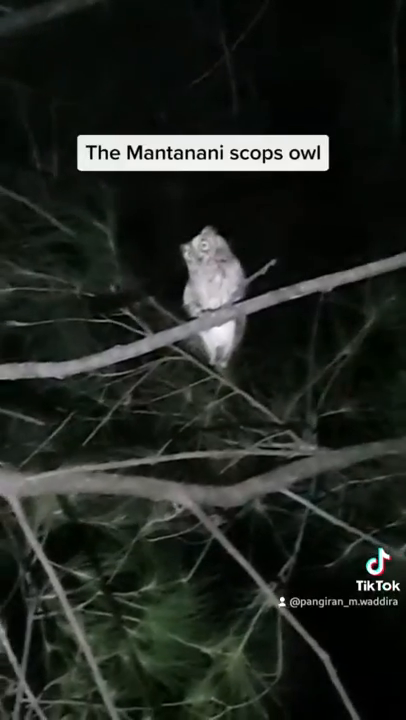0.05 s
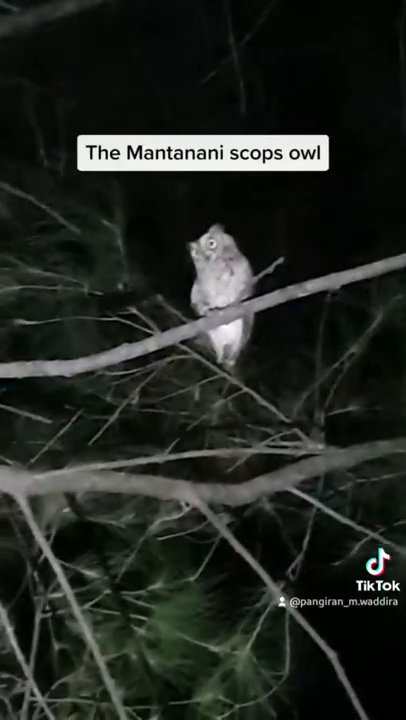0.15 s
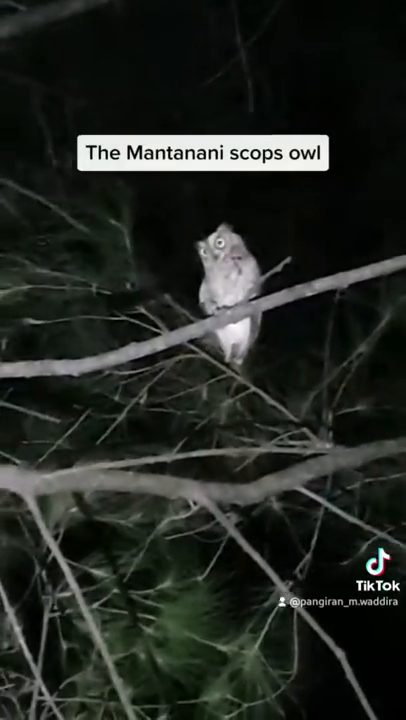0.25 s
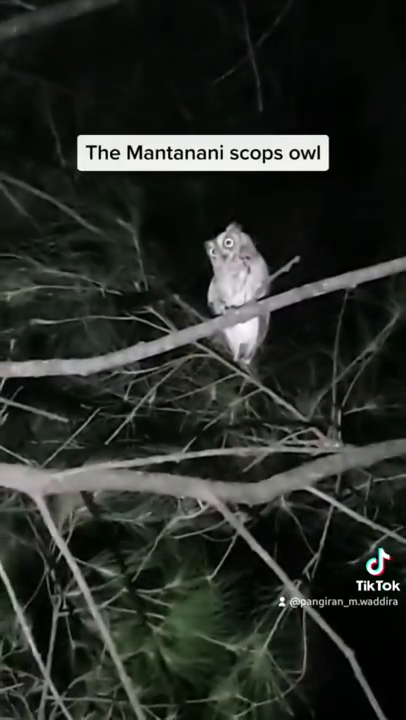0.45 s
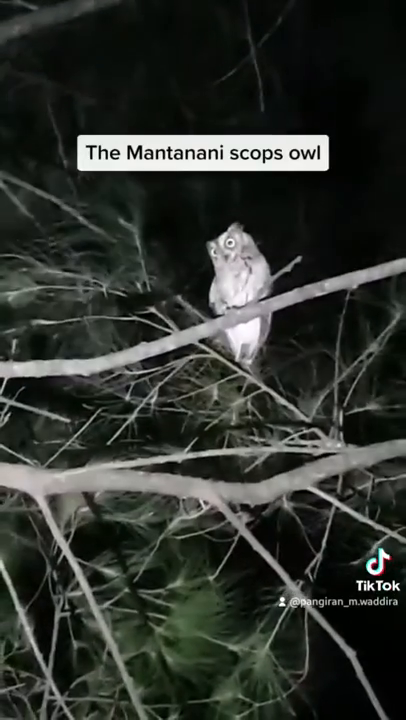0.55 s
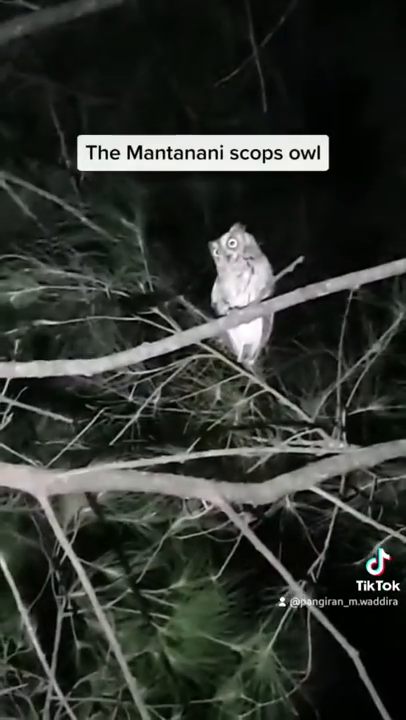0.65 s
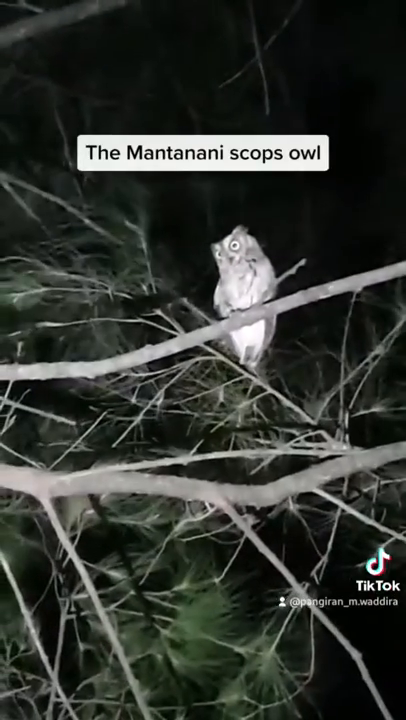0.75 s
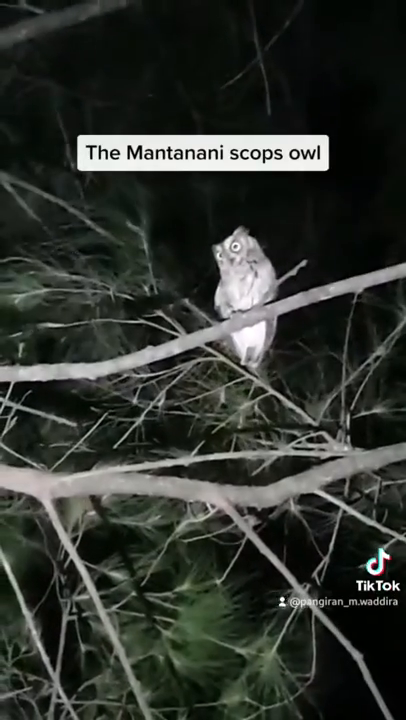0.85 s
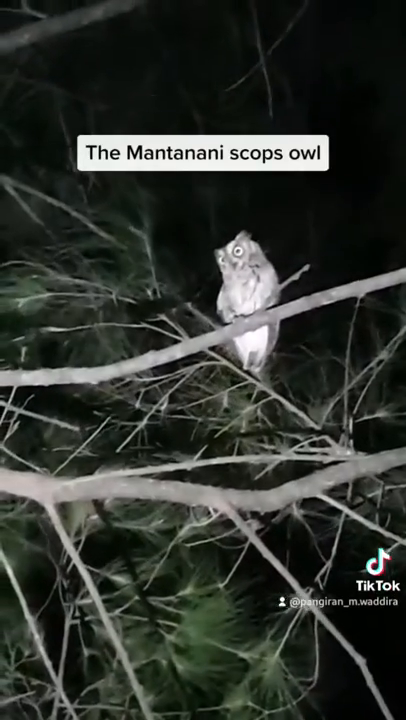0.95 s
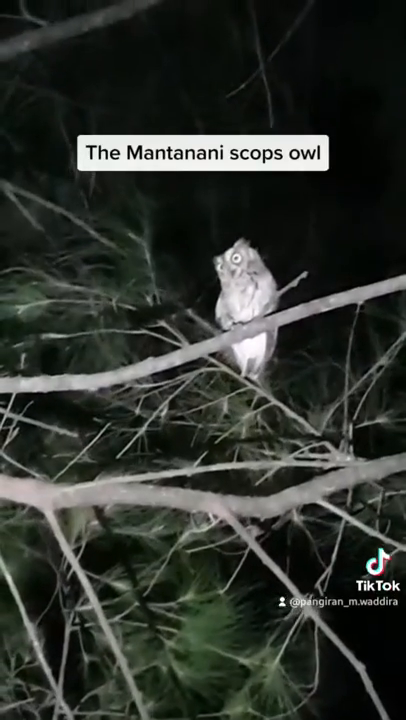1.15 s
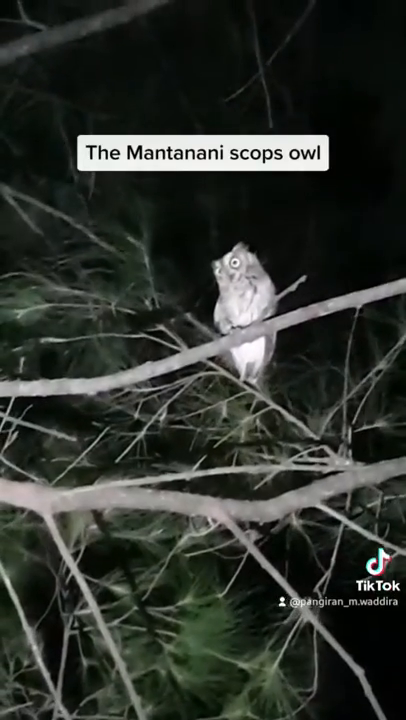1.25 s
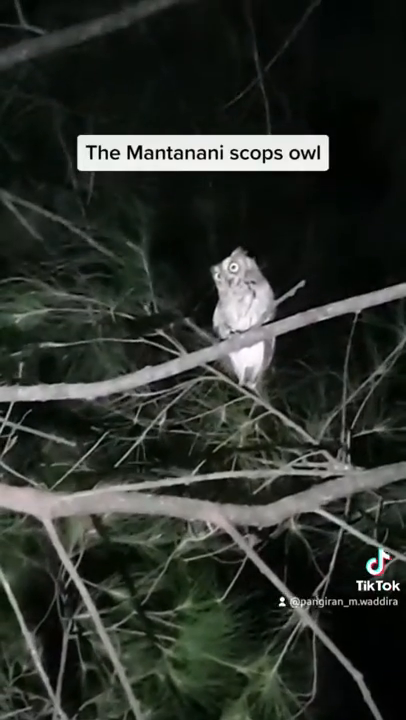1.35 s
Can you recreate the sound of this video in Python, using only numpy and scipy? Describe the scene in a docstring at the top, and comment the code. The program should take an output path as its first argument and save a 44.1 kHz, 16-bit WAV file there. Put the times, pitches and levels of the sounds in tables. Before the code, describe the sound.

An owl gives one long, pure, falling hoot straight ahead, and a second owl overlaps it almost at once. Crickets chirp and tick faintly in the night wood, while a hand clicks and rustles softly on the microphone.

```python
"""Scops owls in a night wood

Straight ahead of a hand-held stereo microphone, a scops owl gives one long, pure, falling hoot.
A second voice, probably its mate, joins a moment later and the two beat. Among the trees a cricket
chirps with its wings and a bush-cricket ticks very high; far insects and a low hum fill the dark.
Close by, the hand on the microphone creaks, clicks and rustles faintly."""
import sys
import numpy as np
from scipy import signal
from scipy.fft import rfft, irfft, next_fast_len
from scipy.io import wavfile
from scipy.ndimage import map_coordinates

SR = 44100
rng = np.random.default_rng(int(sys.argv[2]) if len(sys.argv) > 2 else 0)


def log_audio(samples):
    """Write samples as a 16-bit WAV file to the path given in sys.argv[1]."""
    # one column per channel
    frames = np.atleast_2d(samples).T
    # limit to full scale, then quantise
    limited = np.clip(frames, -1, 1)
    pcm = np.round(limited * 32767).astype(np.int16)
    wavfile.write(sys.argv[1], SR, pcm)


N = 61739

# likeness of left and right in every noise: f/Hz, correlation/0-1
STEREO_LIKENESS = [(30, 0.28), (200, 0.69), (1000, 0.63), (3000, 0.37), (8000, 0.24), (13000, 0.41)]
# night air: f/Hz, relative level/dB
AIR_SPECTRUM = [(25, -10), (55, 0), (120, -4), (250, -9), (500, -11), (1000, -12), (1800, -12.3),
                (3000, -16.5), (5500, -19.5), (9000, -21.5), (14500, -23.5), (15500, -31)]
# far insects: f/Hz, relative level/dB
CHORUS_SPECTRUM = [(3000, -17), (3450, -8), (3750, 2), (4050, -6.5), (4350, -9.5), (4700, -25), (5000, -25),
                   (5500, -24.5)]
# swells of the low hum: t/s, level/dB
HUM_LEVEL = [(0, -60), (.45, -49), (.62, -33.5), (.75, -46), (.92, -36), (1.05, -47), (1.17, -38),
             (1.4, -47)]
# dull rustle of the grip: f/Hz, relative level/dB
RUSTLE_SPECTRUM = [(20, -18), (50, 0.5), (80, -8), (150, -17), (400, -13), (1500, -21.5), (5000, -24),
                   (12000, -38)]
# swells of that rustle: t/s, level/dB
RUSTLE_LEVEL = [(0, -54.5), (.3, -37), (.41, -70), (.49, -51), (.72, -41), (.86, -41), (.93, -49),
                (1.19, -58), (1.25, -57), (1.36, -35.5)]
# creaks of the grip: start/s, length/s, slip spacing/s, level/dB
CREAK_RUNS = [(0.441, 0.054, .0182, -24.5), (0.587, .045, 0.016, -25.5), (0.753, .095, .0138, -28.5)]
# resonances of one slip: f/Hz, relative level/dB, t60/s
THUD_MODES = [(90, -7, 0.019), (210, -1.5, 0.019), (392, 3, 0.0099)]
# handling clicks: t/s, ring level/dB, resonance/Hz, t60/s, crack level/dB
HANDLING_CLICKS = [(0.336, -19, 1905, 0.016, -23), (0.4262, -12.5, 1684, 0.017, -24.5),
                   (0.4604, -21, 1614, 0.0096, -43), (0.56, -21.5, 1617, 0.029, -46),
                   (0.574, -44, 1200, 0.029, -25), (0.637, -37, 1320, 0.024, -21),
                   (0.768, -38, 4500, 0.015, -24), (.876, -24, 2247, 0.044, -30.5),
                   (0.896, -25, 1263, 0.043, -26), (.923, -23, 4320, 0.011, -25),
                   (1.176, -33, 4440, 0.011, -16), (1.288, -30, 2184, 0.021, -34),
                   (1.36, -22.5, 1077, 0.016, -22), (1.3675, -23, 1700, 0.034, -35),
                   (1.391, -25.5, 1100, .03, -19)]
# bright crack of a click: f/Hz, relative level/dB
CRACK_SPECTRUM = [(300, -9), (1500, 1), (4500, 3.5), (9000, -2), (15000, -7.5)]
# runs of bush-cricket ticks: start/s, end/s, tick spacing/s
BUSH_CRICKET_RUNS = [(.0055, .52, .02642), (.598, .61, .0266), (.6635, 1.21, .02673), (1.290, 1.4, .0267)]
# rasp of a tick: f/Hz, relative level/dB
TICK_SPECTRUM = [(8000, -2.5), (10000, -10), (10900, 2.5), (12200, -1.5), (13800, 6.5), (14500, -12),
                 (15500, -22)]
# cricket chirps: start/s, length/s, level/dB
CRICKET_CHIRPS = [(0.027, .11, -35.5), (0.277, .01, -34), (0.2867, .1, -22.5), (0.401, .075, -38),
                  (.672, .1, -21), (0.78, .02, -31), (0.9977, .115, -24), (1.118, .03, -37.5),
                  (1.376, .1, -23.5)]
# hoot of the first owl: t/s, f/Hz, level/dB
FIRST_OWL = [(0.185, 735.2, -33.3), (0.21, 755.6, -18.7), (0.255, 818.5, -9.8), (0.33, 812.7, -10.4),
             (0.4, 822.7, -10.4), (0.44, 808.4, -4.9), (0.49, 809.3, -6.1), (0.56, 782.0, -15.8),
             (0.61, 766.4, -16.3), (0.66, 739.9, -16.3), (0.76, 701.7, -23.2), (0.81, 680.5, -23.7),
             (0.86, 657.6, -28.6), (0.96, 589.0, -43.0)]
# hoot of the owl that joins: t/s, f/Hz, level/dB
SECOND_OWL = [(0.28, 710.5, -33.3), (0.31, 769.4, -9.2), (0.35, 807.6, -18.4), (0.39, 801.9, -26.0),
              (0.42, 790.7, -21.0), (0.452, 810.4, -7.2), (0.475, 828.9, -12.4), (0.49, 806.6, -11.1),
              (0.545, 808.2, -7.7), (0.6, 803.4, -7.9), (0.68, 776.8, -11.5), (0.77, 734.7, -13.2),
              (0.81, 721.5, -14.8), (0.85, 703.6, -20.1), (0.92, 677.7, -20.3), (1.04, 605.1, -39.4)]


def amp(db):
    """Decibels to gain."""
    return 10 ** (np.asarray(db) / 20)


def unit(x):
    """Scale to rms 1."""
    return x / np.sqrt(np.mean(x ** 2) + 1e-20)


def clock():
    """Time of every sample."""
    return np.arange(N) / SR


def along(points, hz):
    """Read (f/Hz, value) points on a log frequency axis."""
    freqs, values = np.transpose(points)
    return np.interp(np.log(hz + 1), np.log(freqs + 1), values)


def envelope(points):
    """Gain per sample from (t/s, level/dB) points."""
    return amp(np.interp(clock(), *np.transpose(points)))


def wobble(rate):
    """A smooth random curve, rate knots a second."""
    return map_coordinates(rng.standard_normal(int(N * rate / SR) + 4), [clock() * rate])


def fade(t, t60):
    """Exponential decay, 60 dB down after t60 seconds."""
    return np.exp(-np.log(1000) * t / t60)


def filtered(x, response):
    """Shape x with a gain given as a function of frequency."""
    size = next_fast_len(N + SR // 2)
    return irfft(rfft(x, size) * response(np.fft.rfftfreq(size, 1 / SR)), size)[..., :N]


def stereo_noise(spectrum):
    """Coloured noise of rms 1, partly alike in left and right."""
    def mid_side_gains(hz):
        angle = np.arccos(np.clip(along(STEREO_LIKENESS, hz), -1, 1)) / 2
        return amp(along(spectrum, hz)) * [np.cos(angle), np.sin(angle)]
    mid, side = filtered(rng.standard_normal((2, N)), mid_side_gains)
    return unit(np.array([mid + side, mid - side]))


def wood_reverb(x, t60=1.4):
    """The trees scatter a call back to the microphone as a diffuse stereo tail."""
    tail = rng.standard_normal((2, SR)) * fade(np.arange(SR) / SR, t60)
    return signal.fftconvolve(x[None], tail / np.linalg.norm(tail[0]), axes=1)[:, :N]


def night_air(db=-33.5, sway_db=.5):
    """The air hisses all around, its level barely swaying."""
    return amp(db + sway_db * wobble(8.03)) * stereo_noise(AIR_SPECTRUM)


def far_insects(db=-40.5, flicker_db=1.9):
    """Distant insects merge into one flickering band of noise."""
    return amp(db + flicker_db * wobble(110)) * stereo_noise(CHORUS_SPECTRUM)


def low_hum(hz=91.4, waver_hz=1.5):
    """A low tone wavers and swells in the dark."""
    pitch = hz + waver_hz * wobble(8.04)
    return envelope(HUM_LEVEL) * np.sin(2 * np.pi * np.cumsum(pitch) / SR)


def grip_rustle():
    """The hand rustles dully, right at the microphone."""
    return envelope(RUSTLE_LEVEL) * stereo_noise(RUSTLE_SPECTRUM)


def grip_creaks(lead_s=.00078, scatter_db=1.5):
    """Skin sticks and slips on the microphone's case; each slip is a dull thud."""
    out = np.zeros(N)
    for start, length, gap, db in CREAK_RUNS:
        for slip in np.arange(start, start + length, gap):
            age = np.maximum(clock() - slip + lead_s, 0)
            thud = sum(amp(mode_db) * np.sin(2 * np.pi * hz * age) * fade(age, t60)
                       for hz, mode_db, t60 in THUD_MODES)
            out += amp(db + rng.normal(0, scatter_db)) * thud
    return out


def handling_clicks(pitch_spread=.19, rise_s=.00018):
    """Each close click is a damped, noisy resonance and a bright crack that die away together."""
    out, crack = np.zeros((2, N)), stereo_noise(CRACK_SPECTRUM)
    for start, ring_db, hz, t60, crack_db in HANDLING_CLICKS:
        age = np.maximum(clock() - start, 0)
        strike = (1 - np.exp(-age / rise_s)) * fade(age, t60)
        pitch = hz * (1 + pitch_spread * wobble(2000))
        body = unit(np.sin(2 * np.pi * np.cumsum(pitch) / SR))
        low_cut = signal.butter(2, .6 * hz, "high", fs=SR, output="sos")
        ring = signal.sosfilt(low_cut, strike * body)
        out += amp(ring_db) * ring + amp(crack_db) * strike * crack
    return out * amp([[-.8], [.8]])  # a little to the right


def bush_cricket(db=-33, tick_s=.0045):
    """A bush-cricket ticks in even runs of short, very high rasps."""
    t, gate = clock(), np.zeros(N)
    for start, end, gap in BUSH_CRICKET_RUNS:
        progress = np.clip((t - start) % gap / tick_s, 0, 1)
        gate += (t > start) * (t < end) * np.sin(np.pi * progress)
    return amp(db) * gate * stereo_noise(TICK_SPECTRUM)


def cricket(stroke_hz=4850, fall_hz=600, stroke_s=.013, gap_s=.0135, slowing_s=.00041):
    """Each wing stroke is a short falling tone; the strokes slow through a chirp."""
    rasp_hz, scatter_hz, jitter_s = 69.6, 39.4, .00055
    out, t, rasp = np.zeros(N), clock(), rasp_hz * wobble(900)
    for start, length, db in CRICKET_CHIRPS:
        for k, (sharp, sway_db, late) in enumerate(rng.standard_normal((9, 3))):
            lag = k * gap_s + slowing_s * k * (k - 1) / 2
            if lag < length:
                progress = (t - start - lag - jitter_s * late) / stroke_s
                on = (progress > 0) & (progress < 1)
                pitch = stroke_hz + scatter_hz * sharp - fall_hz * progress[on] ** 2 + rasp[on]
                swell = np.sin(np.pi * progress[on]) ** 2.1
                out[on] += amp(db + sway_db) * swell * np.sin(2 * np.pi * np.cumsum(pitch) / SR)
    return out


def owl_hoot(contour, overtone_db=-41.5, flutter_depth=.1, attack_s=.0024, release_s=.018):
    """An owl's nearly pure voice lifts, then falls slowly, with a slight flutter."""
    times, hz, db = np.transpose(contour)
    t = clock()
    phase = 2 * np.pi * np.cumsum(np.interp(t, times, hz)) / SR
    voice = np.sin(phase) + amp(overtone_db) * np.sin(2 * phase)
    attack = np.clip((t - times[0]) / attack_s, 0, 1)
    release = np.clip((times[-1] - t) / release_s + 1, 0, 1)
    flutter = 1 + flutter_depth * wobble(170)
    return attack * release * amp(np.interp(t, times, db)) * flutter * voice


def scene(owl_reverb_db=-18.5, cricket_reverb_db=-9.5):
    """Owls straight ahead, insects around, the hand close by."""
    hoots = owl_hoot(FIRST_OWL) + owl_hoot(SECOND_OWL)  # close in pitch, so they beat
    chirps = cricket()
    owls = hoots + amp(owl_reverb_db) * wood_reverb(hoots).mean(axis=0)
    insects = chirps + amp(cricket_reverb_db) * wood_reverb(chirps) + bush_cricket()
    handling = handling_clicks() + grip_creaks()
    distance = (night_air() + far_insects()) * amp([[-.5], [.5]])  # a little to the right
    return distance + low_hum() + grip_rustle() + handling + insects + owls


def record(dry, top_hz=15500, bias=.02):
    """The recorder keeps nothing above its band limit and adds a small steady bias."""
    return filtered(dry, lambda hz: hz < top_hz) + bias


dry = scene()
out = record(dry)
log_audio(out)
```